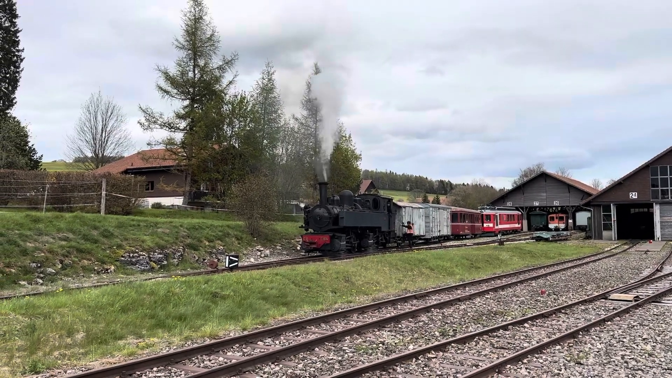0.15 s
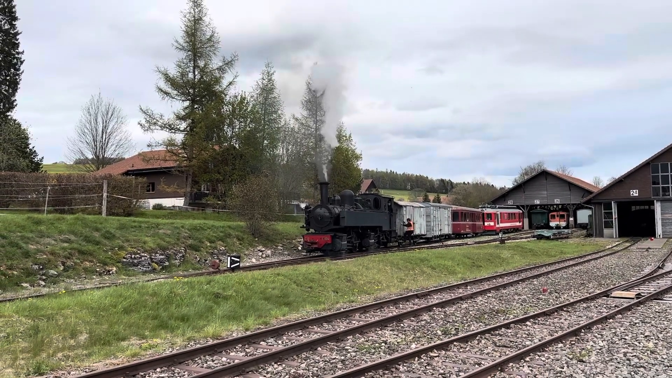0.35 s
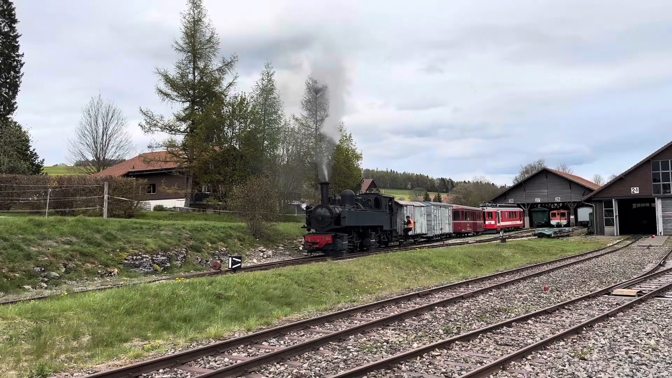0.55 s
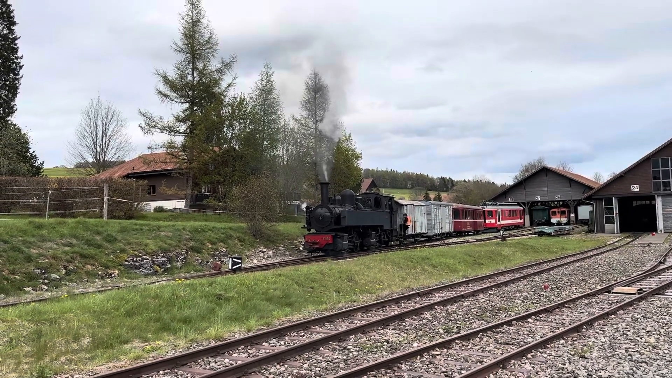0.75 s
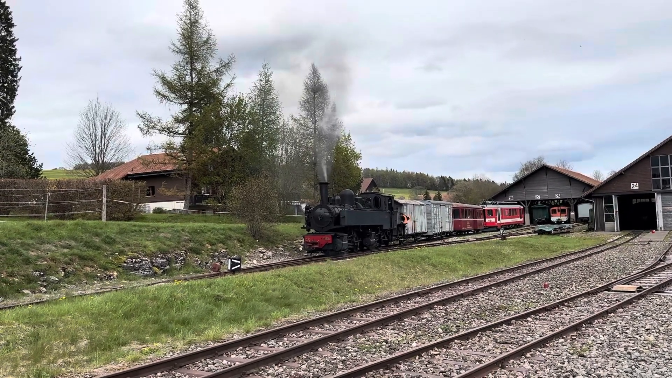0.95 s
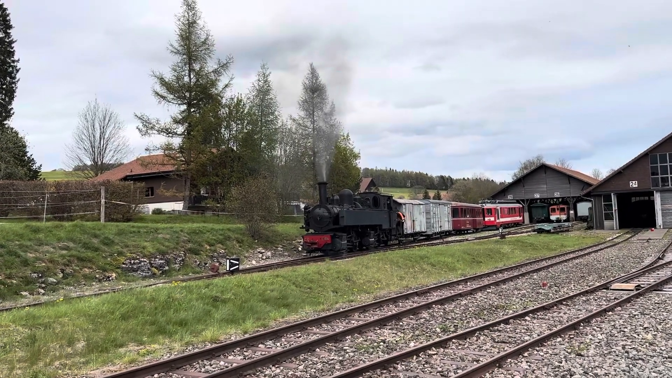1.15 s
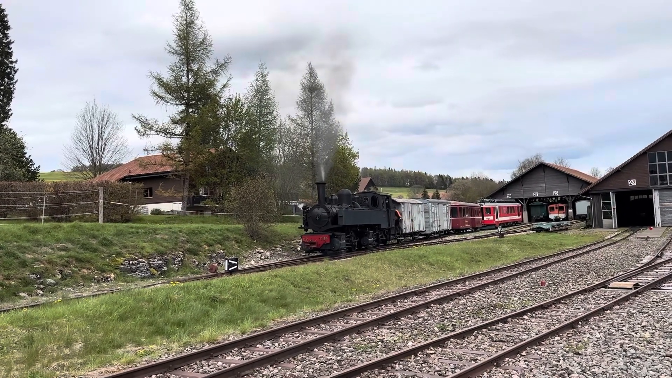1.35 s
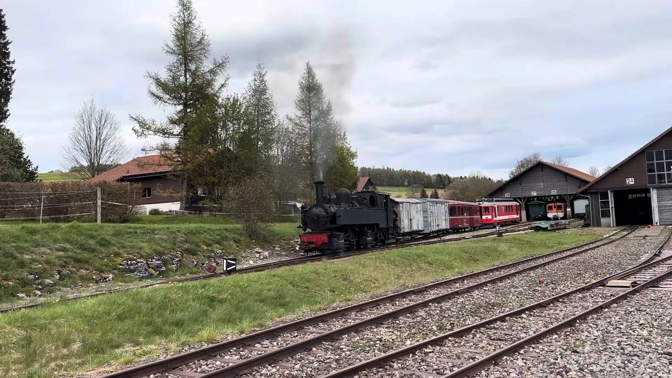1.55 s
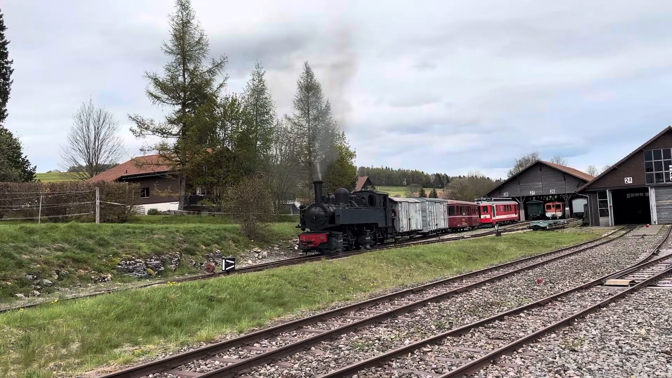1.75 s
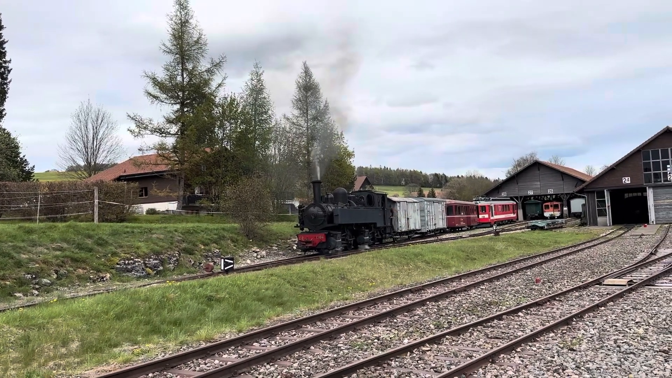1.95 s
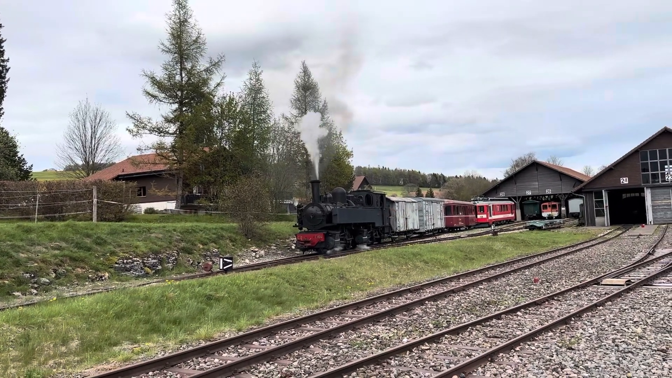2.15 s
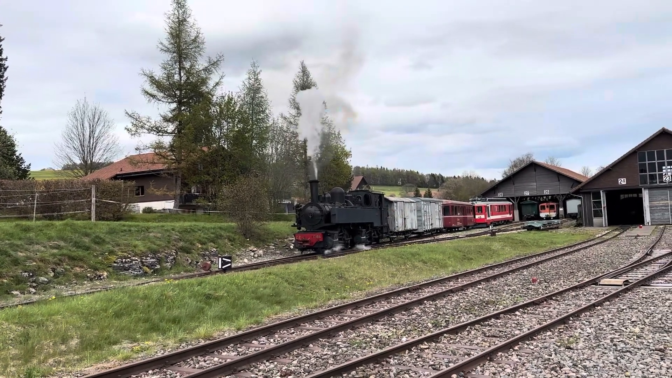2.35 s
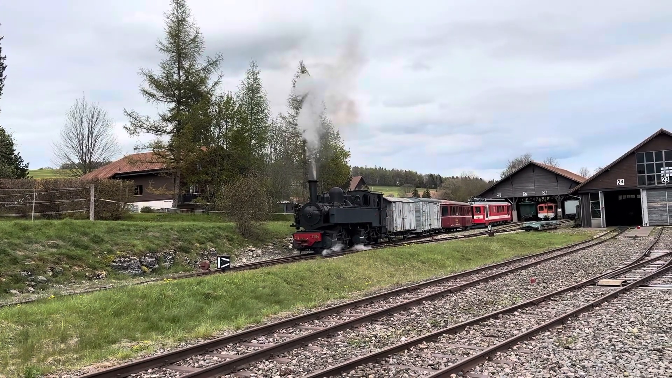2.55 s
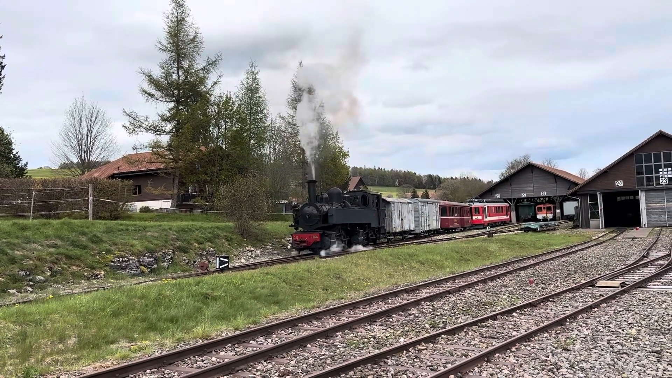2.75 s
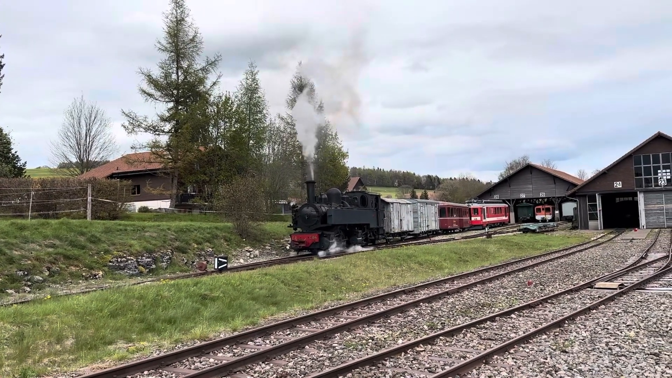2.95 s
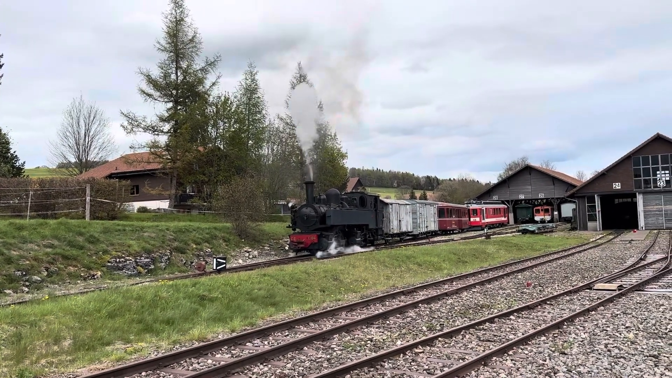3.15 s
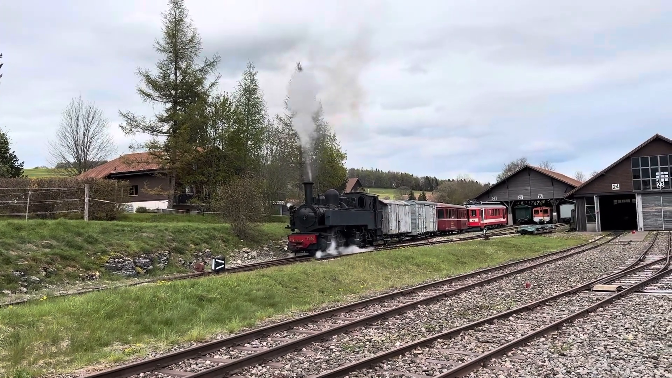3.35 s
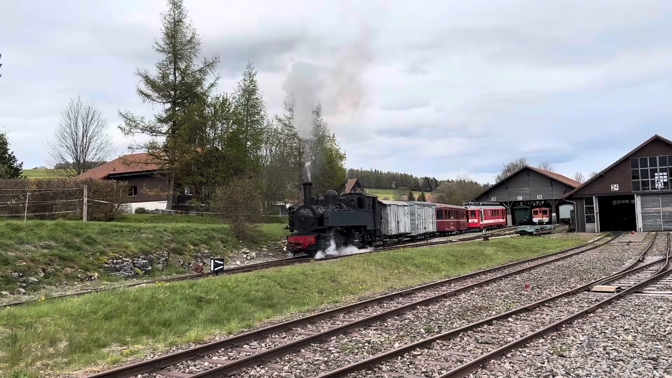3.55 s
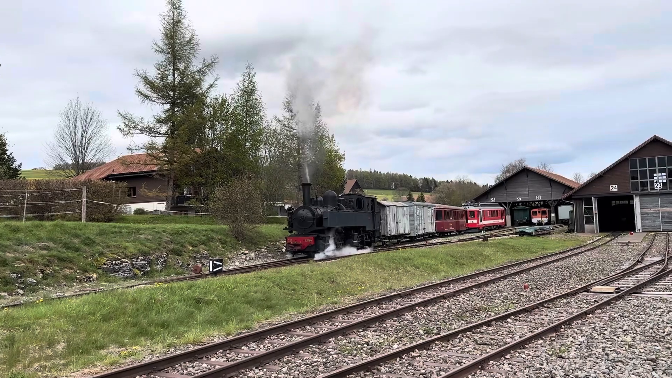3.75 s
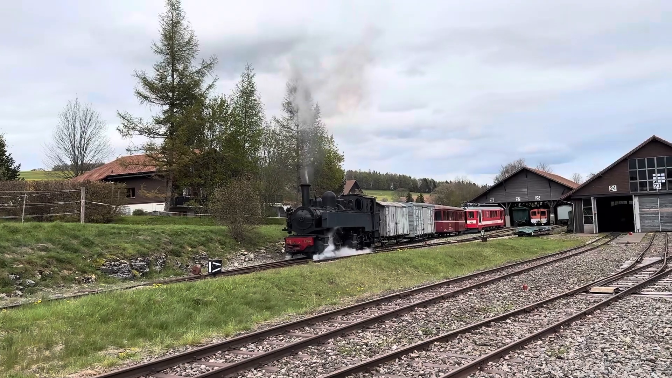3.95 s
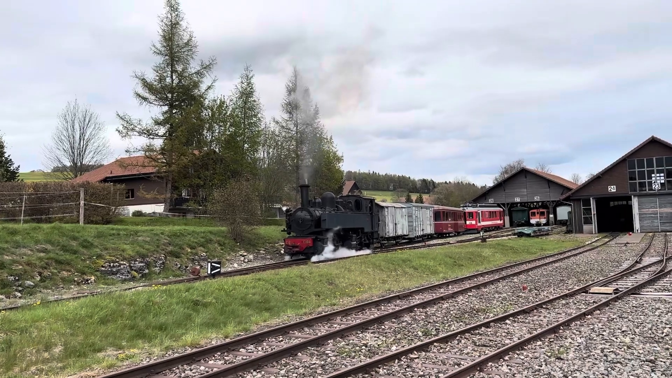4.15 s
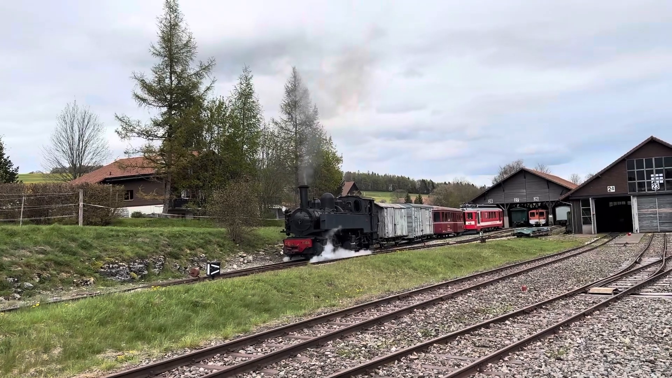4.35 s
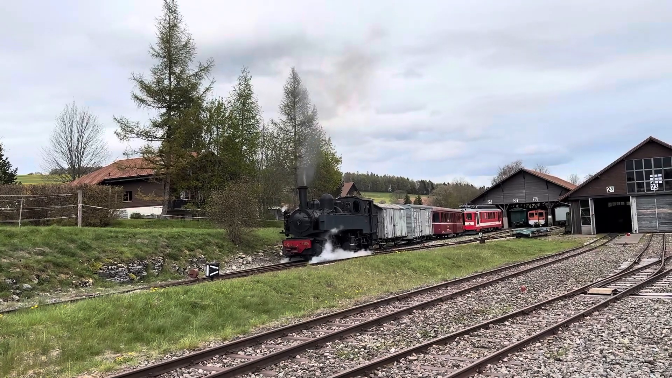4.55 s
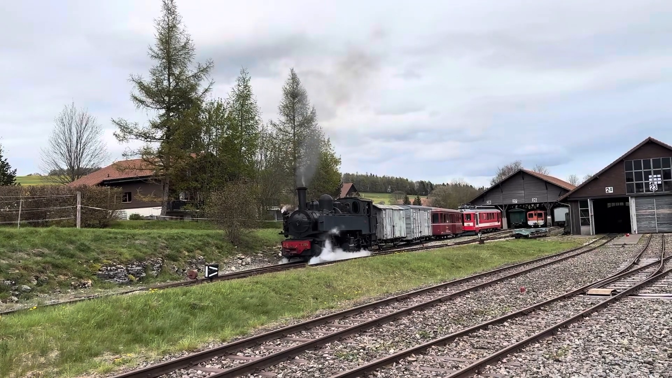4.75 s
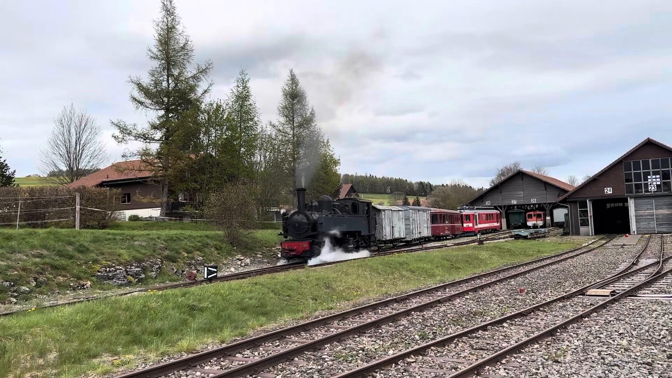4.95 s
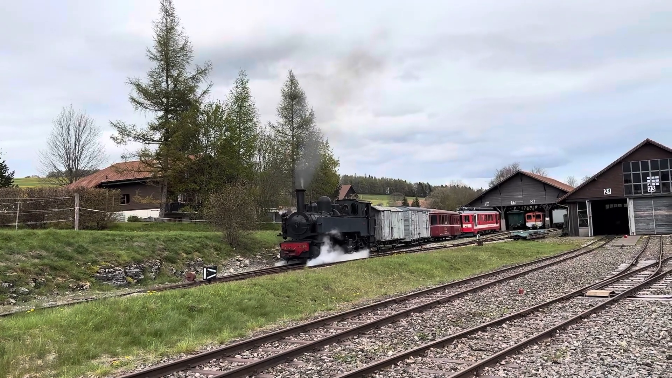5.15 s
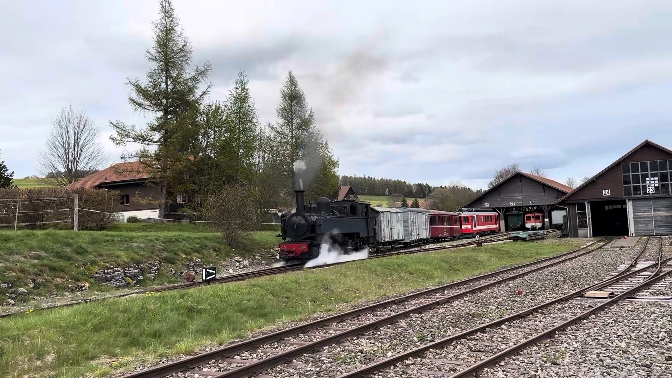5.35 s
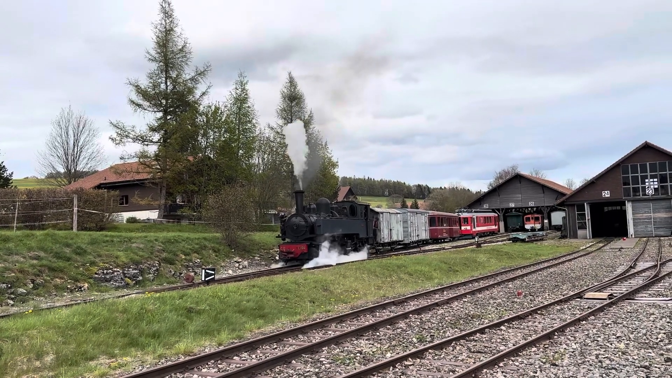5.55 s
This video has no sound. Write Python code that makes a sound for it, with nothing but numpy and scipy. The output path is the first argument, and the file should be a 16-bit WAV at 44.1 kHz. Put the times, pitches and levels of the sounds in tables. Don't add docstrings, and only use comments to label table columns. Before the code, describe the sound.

A small steam locomotive some way off breathes softly, gives uneven roaring, hooting chuffs, then hisses loudly with squeals and thin high whistles as wind thumps the microphone.

```python
import sys
import numpy as np
from scipy import signal
from scipy.fft import rfft, irfft, next_fast_len
from scipy.io import wavfile
from scipy.ndimage import uniform_filter1d, map_coordinates

SR = 44100
rng = np.random.default_rng(int(sys.argv[2]) if len(sys.argv) > 2 else 0)


def invert_db(level):
    return 10 ** (np.asarray(level, dtype=float) / 20)


def output_pcm(signal):
    pcm = np.clip(np.atleast_2d(signal).T, -1, 1) * 32767
    wavfile.write(sys.argv[1], SR, np.round(pcm).astype(np.int16))


N = 247401
TIME = np.arange(N) / SR

# time in seconds, level in dB.
BLOWER_LEVEL = [(0, -46), (.6, -49.5), (1.4, -50), (1.55, -49.5), (2.5, -46.5), (3.8, -48.5), (5.61, -46.5)]
# frequency in Hz, density in dB per Hz.
DRAUGHT_SPECTRUM = [(150, -44), (260, -6), (600, -9), (1000, -9.5), (1400, -4.5), (1750, -8.5), (2300, -11),
                    (2800, -15.5), (3800, -13), (5000, -17.5), (6000, -20), (9500, -18), (11500, -26),
                    (16000, -40)]
# frequency in Hz, density in dB per Hz.
ROAR_SPECTRUM = [(120, -19.5), (300, -6.5), (680, -3), (950, -4), (1400, 4), (1800, -7), (2100, 1.5),
                 (2600, -8), (3100, -2.5), (4400, -3.5), (5800, -10), (9500, -12), (11500, -21),
                 (16000, -21)]
# start in seconds, roar level in dB, rise in s, hold in s, fall in dB per s.
EXHAUST_BEATS = [
    (1.975, -35.5, 0.06, 0.057, 73),
    (2.69, -35.5, 0.041, .03, 190),
    (2.85, -34.5, 0.035, 0.0086, 80),
    (5.368, -37.5, 0.054, 0.024, 44),
]
# start in seconds, level in dB, rise in s, hold in s, fall in dB per s.
RING_SONG = [
    (-.1, -54, 0.31, 1.4, 14),
    (2.6, -54.5, .3, .8, 3),
]
# start in seconds, level in dB, rise in s, hold in s, fall in dB per s.
WATER_SLUGS = [
    (-.1, -42.5, 0.039, 0.057, 77),
    (3.865, -29, 0.03, 0.22, 20.5),
    (4.25, -34, 0.085, .05, 64),
]
# start in seconds, first leap of the hoot in Hz, time at full note in s, brightness in dB.
BEAT_TONE = [
    (1.975, 64.2, .1, -3.5),
    (2.69, 97, .075, 0),
    (2.85, 35.3, .04, -4.5),
    (5.368, 69.6, 0.094, 0),
]


def chimney():
    draught = ringing(rush(DRAUGHT_SPECTRUM, patchy_db=0.56), strength=0.55)
    sound = invert_db(curve(BLOWER_LEVEL) + 0.18 * wobble(6.3)) * draught
    return sound + exhaust() + blower_ring() + hoot()


def exhaust():
    roar = ringing(rush(ROAR_SPECTRUM, patchy_db=1.53), strength=0.069)
    roar = roar * invert_db(0.9 * wobble(45))
    low = filtered(roar, lambda hz: 1 / (1 + (hz / 1000) ** 4))
    high = roar - low
    db = swells(EXHAUST_BEATS)
    faded_db = db.max() - db
    bright_db = np.minimum(latest(BEAT_TONE)[3] + 0.2 * faded_db, 8)
    return invert_db(db + 9.5) * (low + invert_db(bright_db) * high)


def blower_ring():
    song = invert_db(swells(RING_SONG) + 0.92 * wobble(4.4))
    lifted = invert_db(swells(WATER_SLUGS[1:2]) - 8.5 + 1.2 * wobble(13))
    ring_db = 20 * np.log10(song + lifted)
    return whistle(1331 + 14 * wobble(6), ring_db, width_hz=75, clear_db=-28, overtone_db=-40)


# start in seconds, level in dB, rise in s, hold in s.
CHIMNEY_PUFFS = [(1.981, -28.5, 0.0056, 0.0027), (2.009, -24, .02, 0.047), (2.102, -31, .015, 0.022),
                 (2.146, -36, .015, 0.023), (2.195, -48, .03, 1.08), (2.319, -40, .015, 0.026),
                 (2.695, -32, .012, .025), (2.737, -24, .02, 0.0088), (2.846, -30.5, .01, .005),
                 (2.926, -41, .02, 0.036), (5.378, -27.5, 0.011, .006), (5.395, -18, 0.011, 0.043),
                 (5.45, -21, 0.016, 0.018), (5.497, -23, 0.015, .01), (5.529, -28, .008, .006),
                 (5.549, -34, .01, 0.035)]


def hoot():
    full_hz, sag_hz_per_s, kick_s = 1153, 650, 0.038
    rest_hz, recover_s, puff_fall_db_per_s = 1117, 0.15, 520
    t, kick_hz, full_s, _ = latest(BEAT_TONE)
    kick = kick_hz * np.exp(-(t / kick_s) ** 2)
    sag = sag_hz_per_s * np.maximum(t - full_s, 0)
    driven_hz = full_hz + kick - sag
    hz = uniform_filter1d(np.where(t < full_s + recover_s, driven_hz, rest_hz), size=300)
    db = swells([(*row, puff_fall_db_per_s) for row in CHIMNEY_PUFFS])
    return whistle(hz, db, width_hz=110, clear_db=-35.5, overtone_db=-24.5)


# start in seconds, level in dB, rise in s, hold in s, fall in dB per s.
REAR_JET = [
    (3.845, -30, .04, 1.73, 8),
]
# frequency in Hz, density in dB per Hz.
REAR_JET_SPECTRUM = [(300, -19), (800, -16), (1350, -7), (1700, -6.5), (2400, -2), (2800, -1), (3300, -2),
                     (4000, -6.5), (5300, -10), (5900, -16.5), (7500, -12.5), (10000, -8.5), (11500, -25.5),
                     (16000, -16.5)]
# frequency in Hz, density in dB per Hz.
SLUG_SPECTRUM = [(200, -30), (320, -6.5), (600, -13.5), (900, -7), (1300, 0.5), (1700, 0.5), (2200, -0.5),
                 (2700, -39), (3400, -3), (5000, -6.5), (6000, -12.5), (9000, -14), (11500, -24),
                 (16000, -31)]


def rear_cock():
    jet = ringing(rush(REAR_JET_SPECTRUM, patchy_db=0.5), strength=0.42)
    sound = invert_db(swells(REAR_JET) + 0.11 * wobble(9)) * jet
    return sound + water_slugs() + rear_whistles()


def water_slugs():
    wet_db, dries_db_per_s, dry_db = 8.5, 57, -3
    slug = rush(SLUG_SPECTRUM, patchy_db=1.5)
    gurgle = filtered(slug, lambda hz: 1 / (1 + (hz / 850) ** 6))
    since_s = latest(WATER_SLUGS[:2])[0]
    gurgle_db = np.maximum(wet_db - dries_db_per_s * since_s, dry_db)
    return invert_db(swells(WATER_SLUGS)) * (slug + (invert_db(gurgle_db) - 1) * gurgle)


# time in seconds, pitch in Hz.
REAR_PITCH = [(4.04, 8540), (4.08, 8370), (4.135, 8350), (4.16, 8190), (4.25, 8130), (4.38, 8370),
              (4.5, 8275), (5.61, 8070)]
# start in seconds, level in dB, rise in s, hold in s, fall in dB per s.
REAR_NOTES = [
    (4.03, -27.5, 0.074, 0.091, 300),
    (4.38, -34, 0.016, 0.068, 250),
    (4.51, -33.5, 0.021, 0.36, 37),
    (5.05, -37.5, 0.14, 0.29, 60),
    (5.5, -46, 0.037, 0.023, 150),
]
# start in seconds, level in dB, rise in s, hold in s, fall in dB per s.
SHRIEK = [
    (3.87, -27, .03, 0.13, 300),
]
# start in seconds, level in dB, rise in s, hold in s, fall in dB per s.
SQUEAL = [
    (4.197, -23, .014, 0.023, 170),
    (4.31, -32.5, 0.024, 0.058, 400),
    (4.4, -42, .01, 0.038, 110),
]


def rear_whistles():
    pitch_hz = curve(REAR_PITCH) + 18 * wobble(12)
    note_db = swells(REAR_NOTES) + 1.8 * wobble(18)
    sound = whistle(pitch_hz, note_db, width_hz=120, clear_db=-34, overtone_db=-40)
    sound += whistle(9000, swells(SHRIEK), width_hz=480, clear_db=-20, overtone_db=-40)
    squeal_db = swells(SQUEAL) + 1.2 * wobble(30)
    sound += whistle(7210 + 25 * wobble(16), squeal_db, width_hz=130, clear_db=-28, overtone_db=-17)
    return sound


# start in seconds, level in dB, rise in s, hold in s, fall in dB per s.
FRONT_JET = [
    (1.47, -52.5, .08, 0.077, 4),
    (1.9, -40, 0.73, 1.2, 30),
    (3.82, -32, 0.082, 0.1, 50),
]
# frequency in Hz, density in dB per Hz.
FRONT_JET_SPECTRUM = [(500, -13), (1100, -11), (1600, -7.5), (2000, -8), (2550, -11), (3200, -4.5),
                      (4100, -3.5), (4800, -3.5), (5300, -3.5), (5900, -10.5), (7500, -5), (10300, -3.5),
                      (11500, -20), (16000, -12.5)]
# start in seconds, level in dB, rise in s, hold in s, fall in dB per s.
SPRAY = [
    (-.1, -49.5, 0.48, 0.8, 250),
    (1.1, -56, .05, .1, 3.5),
    (2.3, -42, 0.53, 0.99, 5),
    (3.83, -35, .05, .01, 16),
]
# frequency in Hz, density in dB per Hz.
SPRAY_SPECTRUM = [(6000, -30), (8000, -12), (8800, -5), (9300, -2), (10400, 0), (11200, -10), (12500, -13),
                  (16000, -14)]
# start in seconds, level in dB, rise in s, hold in s, fall in dB per s.
SECOND_TONE = [
    (2.85, -49, 0.31, 0.53, 20),
]


def front_cock():
    not_yet_s = np.maximum(2.75 - TIME, 0)
    edge_db = swells(SPRAY[:3]) - 2 - 45 * not_yet_s
    sound = whistle(8660 + 40 * wobble(8), edge_db, width_hz=270, clear_db=-34, overtone_db=-40)
    sound += whistle(5350, swells(SECOND_TONE), width_hz=180, clear_db=-27, overtone_db=-40)
    for rows, spectrum in ((FRONT_JET, FRONT_JET_SPECTRUM), (SPRAY, SPRAY_SPECTRUM)):
        level = invert_db(swells(rows) + 1.5 + 0.15 * wobble(8.2))
        sound += level * rush(spectrum, patchy_db=1.9)
    return sound


# time in seconds, peak in dB, pitch in Hz.
METAL_TICKS = [
    (.1711, -23.5, 1750),
    (0.958, -34.5, 1180),
]


def ticks():
    sound = np.zeros((2, N))
    parts = ((-1.0, 1, 0.61), (-10.5, 0.51, 0.52), (-15, 2.7, 0.34))  # dB, pitch ratio, half length ms
    for s, db, hz in METAL_TICKS:
        for part_db, ratio, half_ms in parts:
            add(sound[0], s, db + part_db, ratio * hz, half_ms)
    return sound


# time in seconds, level in dB.
WIND_LEVEL = [(0.0, -46), (0.19, -48.5), (0.33, -59.5), (0.59, -66.5), (1.0, -70), (1.4, -68), (1.8, -56.5),
              (1.93, -49), (2.11, -55), (2.53, -68.5), (2.67, -60), (2.92, -54.5), (3.27, -59), (3.97, -65),
              (4.42, -50.5), (4.69, -50.5), (4.89, -62.5), (5.58, -47.5)]
# frequency in Hz, density in dB per Hz.
GUST_SPECTRUM = [(20, -30), (40, 8), (60, 8), (110, -0.5), (180, -4.5), (300, -47)]
# time in seconds, peak in dB, pitch in Hz, half length in cycles.
EDDIES = [(.035, -31, 90, 0.72), (.087, -37, 81, 1.0), (.122, -33.5, 150, 0.79), (.152, -37, 90, 0.88),
          (.222, -29.5, 117, 0.82), (.248, -23.5, 78.4, 0.88), (0.315, -32, 126, 1.2),
          (1.481, -33, 74, 1.1), (1.737, -36.5, 150, 1.5), (1.765, -27.5, 95, 0.66),
          (1.854, -29.5, 88, 0.45), (1.921, -31, 97, 0.81), (2.242, -36, 149, 2.5),
          (2.746, -30.5, 155, 2.0), (2.891, -34, 166, 1.4), (2.97, -34, 84.6, 1), (3.231, -46, 74, .65),
          (3.576, -25.5, 111, 1.17), (4.244, -30, 118, 1.3), (4.293, -34, 74, 0.96),
          (4.439, -29, 101.7, 0.97), (4.631, -39.5, 125, 2.5), (4.735, -24.5, 107, 1.1),
          (4.848, -28.5, 172, 1.1), (4.937, -33, 94, 0.86), (5.058, -35, 73, .9), (5.138, -32.5, 119, 1.5),
          (5.25, -27, 166, 1.27), (5.292, -33, 70, 2.1), (5.409, -26, 155, 1.37)]


def wind():
    shared, own = rush(GUST_SPECTRUM, patchy_db=2.5)
    buffets = np.array([shared + 0.54 * own, shared - 0.47 * own])
    lumpy = unit(invert_db(2.3 * wobble(21.96)) * buffets)
    sound = invert_db(curve(WIND_LEVEL) + 9) * lumpy
    pans_db = 3.5 * rng.standard_normal(len(EDDIES))
    for (s, db, hz, cycles), pan_db in zip(EDDIES, pans_db):
        half_ms = 1000 * cycles / hz
        for port, side in zip(sound, (0.5, -0.5)):
            port_db = db + side * pan_db
            add(port, s + 0.00076 * side, port_db, hz, 0.5 * half_ms)
            add(port, s - 0.004, port_db - 10.5, 1.71 * hz, 0.57 * half_ms)
            add(port, s + 0.0055, port_db - 6.5, 0.61 * hz, 1.33 * half_ms)
    return sound


# frequency in Hz, lead of the left in radians.
PORT_LEAD = [(400, 0), (1500, .6), (2400, 0), (3100, -1.3), (3800, -.9), (4500, -.2), (5600, .9), (6400, 0),
             (7600, .1), (8600, 1.6), (9300, 3.0), (10300, 3.3), (11900, 6.2), (13000, 6.4), (14300, 9.3)]
# frequency in Hz, extra lead of the left in radians.
ASIDE_LEAD = [(1200, -0.23), (1700, -0.1), (3000, -0.17), (3800, -0.53), (5500, -1), (6500, -.2),
              (7600, 0.8), (8500, 0.06)]
# frequency in Hz, left minus right in dB.
PORT_BALANCE = [(100, -5), (300, -1.5), (500, -3), (1200, -4.5), (1800, -3), (2400, 2.5), (3100, -1.5),
                (3800, -5), (4600, -2), (6000, -0.5), (16000, -1)]
# frequency in Hz, likeness from 0 to 1.
PORT_LIKENESS = [(200, 0.9), (500, 0.93), (1500, 0.64), (3000, .75), (4500, 1), (5600, 0.23), (6600, 1),
                 (9000, 0.95), (16000, 0.5)]


def ports(pair, aside, spread):
    def mix(hz):
        turn = np.arccos(np.clip(along(PORT_LIKENESS, hz), 0, 1) ** spread) / 2
        return np.array([np.cos(turn), np.sin(turn)])

    def shade(hz):
        lead = along(PORT_LEAD, hz) + aside * along(ASIDE_LEAD, hz)
        left = invert_db(along(PORT_BALANCE, hz) / 2) * np.exp(0.5j * lead)
        return np.array([left, 1 / left])

    direct, scattered = filtered(pair, mix)
    return filtered(np.array([direct + scattered, direct - scattered]), shade)


# frequency in Hz, width in Hz, lift in dB.
BOILER_MODES = [(816, 9, 8), (1377, 24, -3), (2018, 34, 5.5), (2373, 7.7, 14.5), (3148, 17, 9)]


def ringing(x, strength):
    def response(f):
        modes = 0
        for centre, width, db in BOILER_MODES:
            damping = 1j * f * width
            modes = modes + invert_db(db) * damping / (centre ** 2 - f ** 2 + damping)
        return 1 + strength * modes
    return filtered(x, response)


def rush(spectrum, patchy_db):
    z = signal.stft(rng.standard_normal((2, N)), nperseg=512)[2]
    field = uniform_filter1d(rng.standard_normal(z.shape[1:]), size=6, axis=0)
    field = uniform_filter1d(field, size=10, axis=1)
    pair = signal.istft(z * invert_db(patchy_db * unit(field)), nperseg=512)[1][:, :N]
    return unit(filtered(pair, lambda hz: invert_db(along(spectrum, hz))))


def whistle(hz, db, width_hz, clear_db, overtone_db):
    turn = 2 * np.pi * np.cumsum(hz + 0 * TIME) / SR
    rough = 1 / (1 + invert_db(2 * (db - clear_db)))
    noise = wobble(width_hz) + 1j * wobble(width_hz)
    swing = np.sqrt(1 - rough) + np.sqrt(rough / 2) * noise
    overtone = invert_db(overtone_db) * swing ** 2 * np.exp(2j * turn)
    direct = np.imag(swing * np.exp(1j * turn) + overtone)
    scattered = wobble(width_hz) * np.sin(turn)
    return invert_db(db + 1.5) * np.array([direct, scattered])


def add(track, s, db, hz, half_ms):
    near = slice(max(0, round((s - 0.1) * SR)), round((s + 0.1) * SR))
    t = TIME[near] - s
    bell = np.exp(-0.5 * (1000 * t / half_ms) ** 2)
    track[near] += invert_db(db) * bell * np.cos(2 * np.pi * hz * t + 0.8)


def swells(rows):
    t = TIME[::16]
    power = np.zeros(len(t))
    for s, db, rise, hold, fall in rows:
        opening = np.clip((t - s) / rise, 0, 1) ** 2
        falling_s = np.maximum(t - s - rise - hold, 0)
        power += opening * invert_db(2 * (db - fall * falling_s))
    return np.interp(TIME, t, 10 * np.log10(power + 1e-12))


def latest(rows):
    s, *cols = np.transpose(rows)
    row = np.maximum(np.searchsorted(s, TIME) - 1, 0)
    return TIME - s[row], *[c[row] for c in cols]


def curve(rows):
    s, value = np.transpose(rows)
    return np.interp(TIME, s, value)


def wobble(rate):
    coarse = TIME[::32]
    knots = rng.standard_normal(int(N * 500 / SR) + 4)
    return np.interp(TIME, coarse, map_coordinates(knots, [coarse * rate]))


def along(points, hz):
    f, v = np.transpose(points)
    return np.interp(np.log(hz + 1), np.log(f + 1), v)


def filtered(x, response):
    m = next_fast_len(N + 8192)
    return irfft(rfft(x, m) * response(np.fft.rfftfreq(m, 1 / SR)), m)[..., :N]


def unit(x):
    return x / np.sqrt(np.mean(x ** 2) + 1e-20)


def scene():
    engine = ports(chimney() + front_cock() + ticks(), aside=0, spread=0.75)
    rear = ports(rear_cock(), aside=1, spread=0.64)
    return engine + rear + wind()


def band_limit(x):
    return signal.sosfilt(signal.butter(12, 15800, fs=SR, output="sos"), x)


# frequency in Hz, gain in dB.
SUM_GAIN = [(8800, 0), (9150, -6), (10250, -5), (10500, -1.5), (13700, -4), (14100, -12)]
# frequency in Hz, gain in dB.
DIFFERENCE_GAIN = [(6200, 0.5), (6500, 13), (7900, -3), (8250, -2.5), (11200, -3), (11600, -15),
                   (13000, -16), (13300, -4)]


def record(dry):
    rumble = lambda hz: 1 / (1 + (42 / (hz + 1)) ** 4)
    notch = lambda hz: 1 - 0.32 * np.exp(-((hz - 5710) / 160) ** 2)
    both = filtered(dry[0] + dry[1], lambda hz: rumble(hz) * notch(hz) * invert_db(along(SUM_GAIN, hz))) / 2
    apart = filtered(dry[0] - dry[1], lambda hz: rumble(hz) * invert_db(along(DIFFERENCE_GAIN, hz))) / 2
    return band_limit(np.array([both + apart, both - apart]))


dry = scene()
out = record(dry)
output_pcm(out)
```